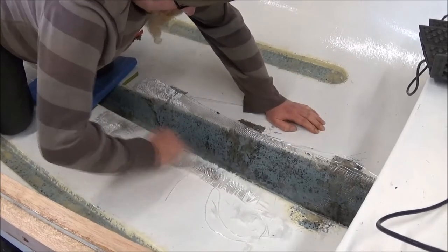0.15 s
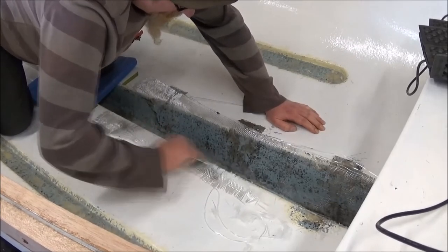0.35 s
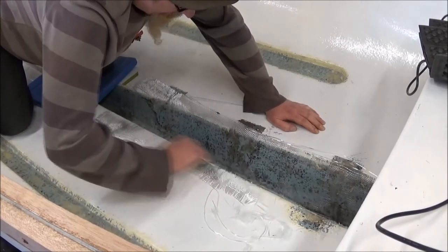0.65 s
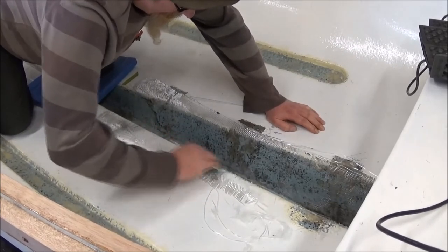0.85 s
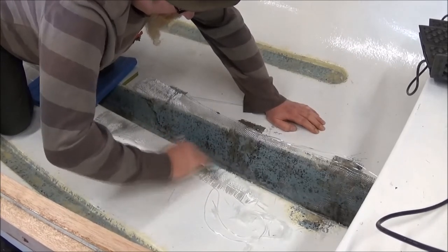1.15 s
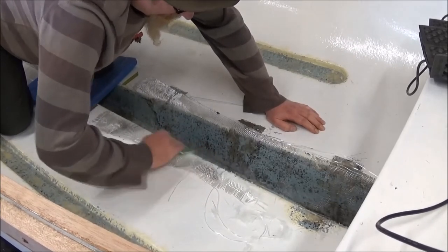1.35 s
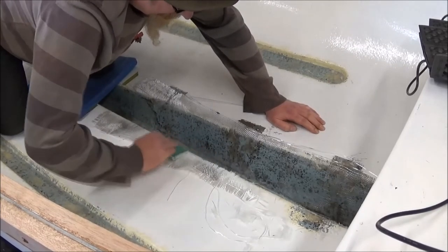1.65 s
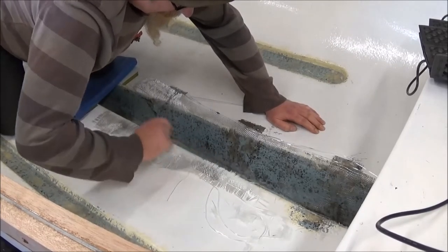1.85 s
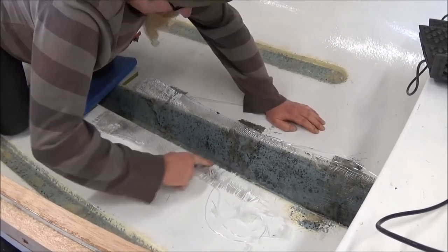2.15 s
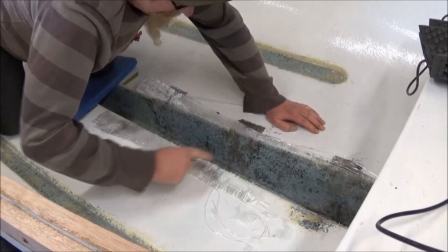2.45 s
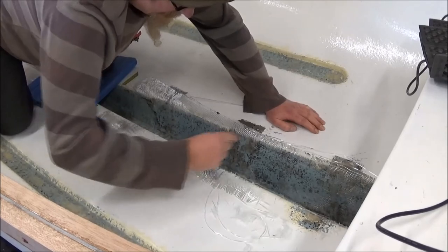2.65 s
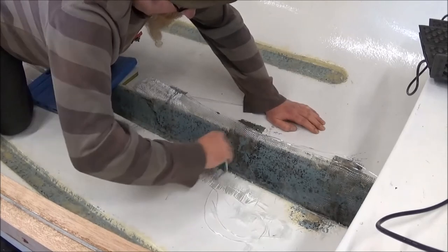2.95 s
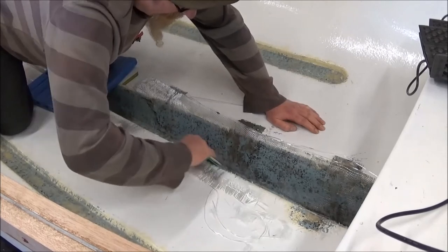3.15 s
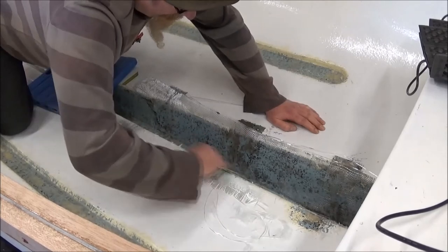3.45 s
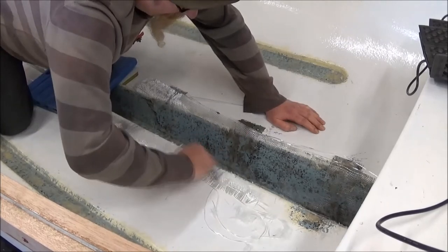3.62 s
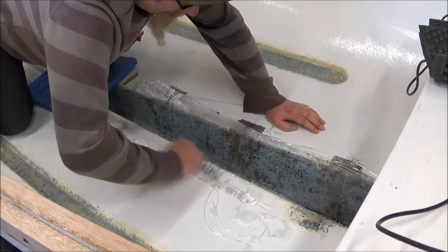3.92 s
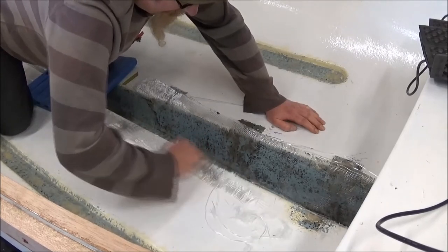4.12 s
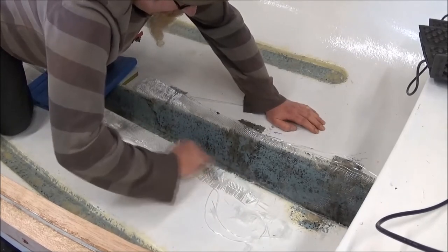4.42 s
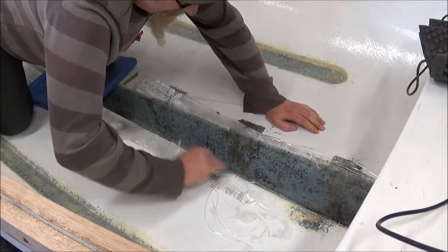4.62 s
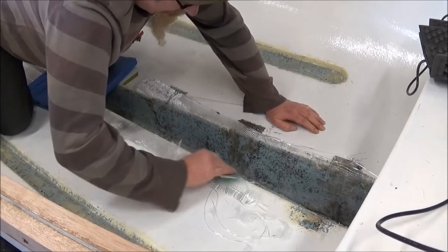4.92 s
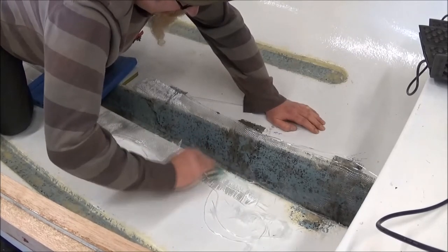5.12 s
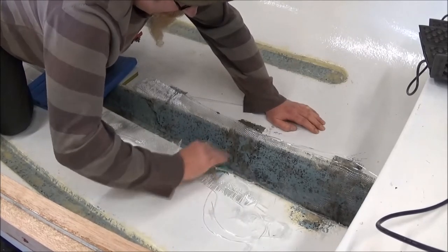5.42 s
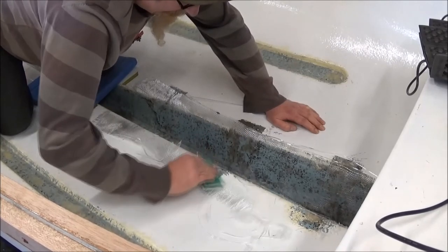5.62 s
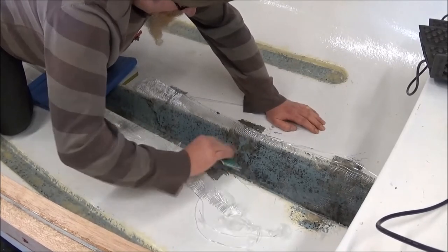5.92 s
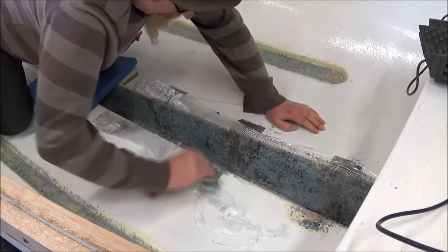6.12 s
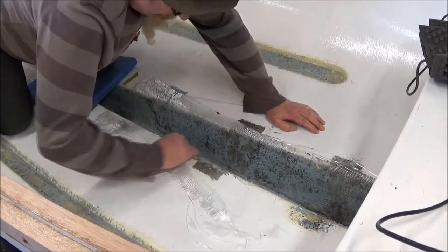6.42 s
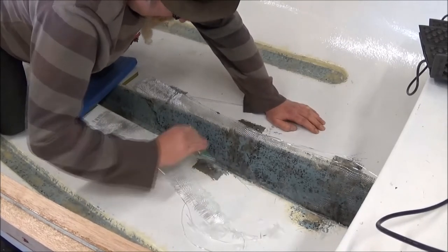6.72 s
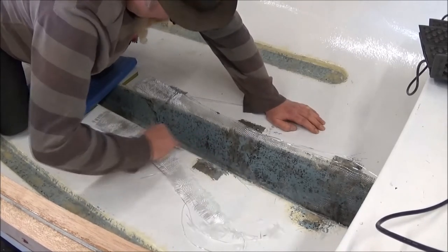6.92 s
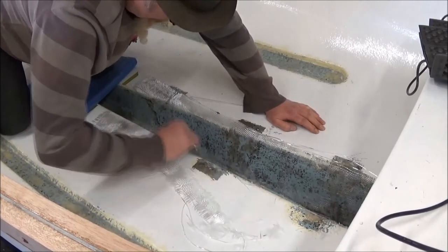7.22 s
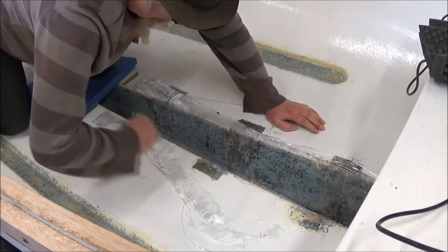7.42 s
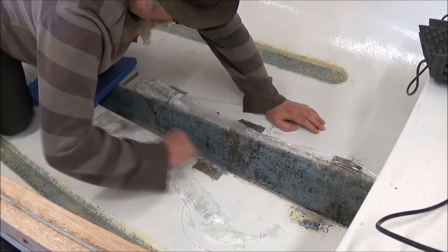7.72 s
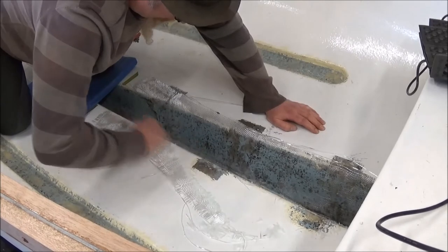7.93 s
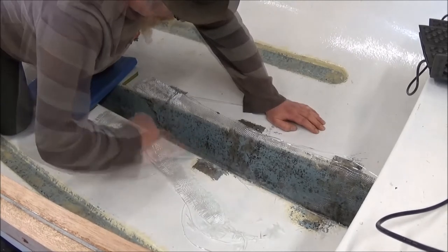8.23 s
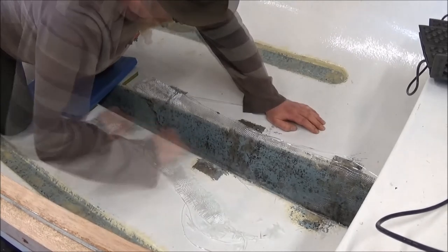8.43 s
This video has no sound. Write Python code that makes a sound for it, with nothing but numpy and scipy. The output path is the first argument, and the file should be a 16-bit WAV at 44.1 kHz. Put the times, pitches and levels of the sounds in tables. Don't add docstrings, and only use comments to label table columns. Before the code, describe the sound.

Close, dry sandpaper strokes go briskly back and forth, about six a second, over rough hardened resin, the hollow hull drumming beneath. After two seconds they pause for a knock, faint scuffs and ticks, then resume as fast. Later come broken strokes, low thumps, and lighter sweeps fading out. Workshop with short reflections and faint hum, small camera microphone nearby.

```python
import sys
import numpy as np
from scipy import signal
from scipy.fft import irfft
from scipy.io import wavfile
from scipy.ndimage import uniform_filter1d, map_coordinates

SR = 44100
rng = np.random.default_rng(int(sys.argv[2]) if len(sys.argv) > 2 else 0)


def volts_from_db(level):
    exponent = np.asarray(level, float) / 20
    return 10 ** exponent


def transcribe(u):
    v = np.clip(np.atleast_2d(u).T, -1, 1)
    q = np.round(v * 32767).astype(np.int16)
    wavfile.write(sys.argv[1], SR, q)


N = 377937

# time [s], level [dB].
WORKSHOP_LEVEL = [
    (0, -57),
    (2.6, -54),
    (5.9, -57.5),
    (6.8, -58.5),
    (7.25, -64.5),
    (8.57, -71),
]
# frequency [Hz], density [dB per Hz].
WASH_SPECTRUM = [(20, -1), (60, -11), (200, -9.5), (400, -18), (900, -14.5), (1600, -23.5), (2300, -24.5),
                 (9000, -30.5), (15800, -37)]
# frequency [Hz], level [dB].
MAINS_HUM = [(100, -64.5), (199.5, -59)]
# frequency [Hz], width [Hz], level over the wash [dB].
MACHINE_WHINE = [(1290, 81, -14), (1647, 26, -16), (1730, 25, -22)]
# centre [s], level [dB], half-width [s].
WHINE_SWELLS = [
    (2.0, 1, 0.096),
    (5.92, 7, 0.14),
    (6.8, 0, 0.11),
]

# frequency [Hz], t60 [s].
WALL_DECAY = [(250, 0.51), (700, 0.42), (1700, 0.35), (4600, 0.37), (12000, 0.17)]
# frequency [Hz], likeness [0..1].
EAR_LIKENESS = [(60, 1.0), (300, 0.93), (700, 0.62), (1400, 0.12), (3000, 0.6), (7000, 0.57), (10000, 0.82),
                (12500, 0.89)]

# time [s], push [dB], push length [s], knock [dB], boom [dB].
THUMPS = [
    (1.05, -49, 0.018, -57, -40),
    (2.065, -35, 0.016, -25, -33.5),
    (5.477, -27, 0.016, -36.5, -43),
    (6.041, -29.5, 0.018, -30.5, -44),
    (6.423, -36, 0.016, -32, -51),
    (6.9, -50, 0.011, -42, -58),
    (7.292, -34, 0.015, -30, -46),
    (7.7, -44, 0.014, -39, -60),
    (2.829, -54, .01, -49.5, -58),
]
# frequency [Hz], level [dB], t60 [s].
KNOCK_MODES = [(144, -1.5, 0.1), (217, -2.5, 0.091), (330, -1, 0.036), (423, -6, 0.038),
               (562, -12.5, 0.042)]
BOOM_HZ, BOOM_T60_S = 101, 0.7
KNOCK_SAG, KNOCK_SAG_S = 0.12, 0.027

# frequency [Hz], density [dB per Hz].
DRUM_SPECTRUM = [(90, -42.5), (160, -7.5), (210, 1), (330, 0.5), (520, -2), (760, -6.5), (1000, -24),
                 (1500, -32)]
RASP_SPECTRUM = [(500, -15.5), (750, -6), (1200, -3), (1600, -0.5), (2100, -3.5), (2500, -3), (3300, -29)]
ROCK_SPECTRUM = [(20, -8.5), (40, -10), (62, 1), (80, 3.5), (100, -1.5), (135, 3), (200, -28)]
# frequency [Hz], width [Hz], level [dB].
PANELS = [(221, 93, 10), (416, 58, -2), (535, 36, 7), (1035, 87, 9), (1161, 134, 11), (1321, 41, 13.5)]
# centre [s], level [dB], half-width [s].
CHATTER_SWELLS = [(0, -43.5, 0.067), (.21, -48.5, 0.029), (.385, -37, 0.048), (.54, -52, 0.067),
                  (.99, -47, 0.034), (1.05, -40, 0.017), (1.13, -43.5, 0.037), (1.2, -39, 0.03),
                  (1.37, -46, 0.03), (1.48, -46.5, 0.06), (1.81, -45, 0.043), (2.98, -53, 0.076),
                  (3.91, -44, 0.028), (4.05, -48, 0.05), (4.18, -50.5, 0.033), (4.34, -47, 0.028),
                  (4.89, -44, 0.018), (5.09, -43, 0.014), (5.5, -46, 0.012), (5.59, -45, 0.028),
                  (6.11, -49, 0.027), (6.47, -44, 0.036), (6.56, -46.5, 0.021)]
# centre [s], level [dB], half-width [s].
BUZZ_SWELLS = [(.69, -51, 0.072), (1.33, -51, .04), (1.81, -49.5, 0.074), (2.3, -66, 0.043),
               (2.37, -63, .025), (2.835, -53.5, 0.013), (2.97, -65, 0.038), (3.17, -57, 0.04),
               (3.35, -48.5, 0.08), (3.55, -52, 0.066), (5.75, -64, 0.088), (6.16, -48, 0.066),
               (6.57, -46.5, 0.063), (7.07, -51, 0.05), (7.44, -46.5, 0.02)]
# centre [s], level [dB], half-width [s].
SWAY_SWELLS = [(.93, -53, 0.11), (1.5, -48, 0.17), (1.8, -57, 0.084), (2.15, -38, 0.089), (2.5, -59, .1),
               (3.05, -49, 0.19), (3.7, -41, 0.23), (4.2, -37, 0.26), (4.92, -40.5, 0.23), (5.5, -52, .08),
               (5.9, -62, .1), (6.07, -31, 0.052), (6.2, -52, .08), (6.47, -32, 0.095), (7.73, -63, .06),
               (7.93, -48, .05)]
DRUM_DB, DRUM_LAW = -30, 0.55
RASP_DB, RASP_LAW, RASP_WEIGHT, RASP_LAG_S = -28.5, 0.65, 0.5, 0.015
ROCK_DB, ROCK_LAW, ROCK_REST_DB, SWAY_TRIM_DB = -50.5, 0.82, -77, -14.5
CHATTER_PER_S, CHATTER_HZ, CHATTER_WIDTH_HZ = 62, 303, 133

# start [s], length [s], start level [dB], end level [dB].
STROKES = [(-.03, .12, -14, -28.5), (.297, 0.13, -21.5, -22.5), (.475, 0.12, -19, -24),
           (.643, .12, -20, -21), (.781, .14, -20, -24), (.95, .12, -24, -19.5), (1.1, .12, -21, -23.5),
           (1.251, .1, -24.5, -18), (1.398, 0.1, -22, -22.5), (3.112, 0.13, -19.5, -28),
           (3.275, 0.13, -16, -28.5), (3.432, .14, -20.5, -25), (3.623, .11, -24, -22.5),
           (3.783, 0.12, -21, -23.5), (4.093, .11, -23.5, -21), (4.242, 0.11, -20, -24),
           (4.394, 0.095, -21.5, -23.5), (4.524, 0.087, -22.5, -22.5), (4.643, 0.096, -22, -24),
           (4.778, .12, -20.5, -25.5), (5.121, .13, -23.5, -25)]
# start [s], length [s], start level [dB], end level [dB].
SWEEPS = [
    (6.068, .15, -24.5, -25),
    (6.893, 0.18, -28, -28.5),
    (7.288, 0.18, -28, -31),
    (7.488, 0.082, -28.5, -43),
    (7.719, 0.17, -31.5, -32),
    (7.916, 0.16, -30, -37.5),
    (8.101, 0.14, -33, -34.5),
    (8.271, .14, -34, -35),
    (8.42, 0.16, -38, -34.5),
]
# start [s], length [s], start level [dB], end level [dB].
EASED = [(.109, 0.15, -24.5, -20), (1.583, 0.083, -16.5, -25.5), (1.69, 0.055, -26, -27),
         (1.936, 0.068, -45.5, -46.5), (2.201, 0.2, -41.5, -52), (2.872, .022, -41, -45),
         (2.926, 0.067, -40, -42.5), (3.047, 0.073, -34, -36), (3.975, 0.09, -17, -27.5),
         (4.992, 0.085, -28, -23.5), (5.495, 0.09, -27.5, -33.5), (5.608, 0.087, -25.5, -24.5),
         (6.461, .12, -26, -28)]
# start [s], length [s], start level [dB], end level [dB].
FLICKS = [(1.775, 0.048, -28, -38.5), (1.869, 0.046, -36.5, -37), (2.061, 0.027, -41, -44.5),
          (2.46, 0.048, -47, -60), (2.514, 0.046, -42, -39), (2.689, 0.028, -41, -29.5),
          (2.75, 0.015, -34, -29), (2.9, 0.018, -26.5, -45), (5.419, 0.02, -61, -39),
          (5.466, .013, -33, -42), (5.872, 0.025, -43.5, -60), (6.015, .012, -49, -49),
          (6.036, 0.027, -33.5, -45), (6.386, 0.012, -41, -37), (6.397, 0.025, -51, -23),
          (7.678, 0.038, -35, -43)]
STROKE_RISE_S, SWEEP_RISE_S, EASED_RISE_S, FLICK_RISE_S = 0.0078, 0.0098, 0.024, 0.003
# time [s], pressure [dB], palm resonance [Hz], weight on the hull [dB].
HAND = [(0, -12, 4400, -1), (.7, -10.5, 4030, 1), (1.15, -11, 3900, 1.5), (1.45, -17, 4050, -1),
        (1.65, -12, 3540, -2), (2.05, -4, 3800, -7.5), (2.3, -6, 3730, 3), (2.55, -6.5, 4200, -13),
        (2.85, -21, 4400, -4.5), (3.05, -2, 4400, 3.5), (3.17, -20, 4100, -5), (3.33, -8.5, 4260, -2),
        (4.3, -3, 3500, 0), (5.2, -11.5, 3500, -2), (5.5, -1.5, 3800, 2.5), (6.5, -3.5, 3540, -3.5),
        (6.95, -9, 3860, -6), (8.57, -9, 4120, -7.5)]
# time [s], block note [Hz], note level [dB], finest-grit level [dB].
GRIPS = [(.04, 4000, 5, -0.5), (.2, 4000, 13, 3.5), (.37, 4200, 3, 0), (.54, 4000, -2, 0),
         (.71, 4100, -2.5, 2.5), (.85, 4100, 1, 3.5), (1.01, 3900, -2, 0.5), (1.16, 3400, -11, 0),
         (1.31, 3150, 6, 0), (1.45, 4200, -4, 2), (1.62, 3200, -1, -1), (2.3, 3700, -6, 2),
         (2.54, 5000, -8, 0), (2.72, 4500, -4, -2), (3.17, 3100, -8, 1), (3.33, 4300, 5, -4.5),
         (3.5, 4100, 4.5, -3), (3.68, 3860, 5.5, -1.5), (3.85, 4180, -10, 0), (4.02, 3430, 0.5, 0),
         (4.15, 2950, 2.5, 1), (4.3, 3000, 0.5, 0), (4.44, 2720, 7, -0.5), (4.57, 2950, -3.5, -1),
         (4.7, 2800, 1.5, 1), (4.84, 2850, -0.5, -2), (5.04, 3000, -1, -4), (5.19, 2600, 4, -3.5),
         (5.54, 3300, -8, -6), (5.66, 2540, 2.5, 2), (6.14, 2850, -2.5, -0.5), (6.52, 2850, -3.5, -2),
         (6.99, 3700, -6, 3.5), (7.38, 4100, -5, 1.5), (7.8, 4200, 5, 2), (8.0, 4300, -0.5, 2),
         (8.17, 3800, -10, 1), (8.34, 3200, 3, 0), (8.5, 4000, -5, 1.5)]
GRIP_WIDTH_HZ, BLOCK_EDGE_HZ = 690, 2410

# time [s], peak [dB].
EDGE_TAPS = [(0.9542, -16), (2.0647, -28), (2.4553, -43), (2.5132, -41.5), (2.8794, -34.5), (3.037, -16),
             (5.417, -30), (5.8755, -40), (6.023, -27), (6.0352, -27.5), (6.389, -22), (6.889, -18),
             (7.282, -30), (7.6799, -20.5)]
# time [s], peak [dB].
CRUMB_SNAPS = [
    (1.7494, -15.5),
    (1.7644, -21),
    (2.6584, -47),
    (2.7657, -35),
    (2.8275, -26),
    (2.944, -27),
    (6.7374, -47),
    (6.906, -21),
]
# time [s], peak [dB].
NICKS = [(.955, -12), (1.271, -17.5), (1.4956, -7), (1.8232, -20), (1.8836, -25.5), (1.897, -24.5),
         (1.9449, -35), (1.9835, -31), (2.1113, -36), (2.2424, -28), (2.3061, -31), (2.3761, -31),
         (2.6595, -45), (2.759, -33), (2.7652, -27), (2.8275, -28), (2.8299, -23.5), (2.9022, -24),
         (2.947, -25), (2.9684, -30), (3.0492, -21), (3.0594, -21), (4.031, -11), (4.1885, -6),
         (4.325, -18), (4.7795, -20), (5.1415, -18), (5.4606, -28), (5.4704, -30), (5.8484, -47),
         (5.882, -36), (6.2869, -36), (6.4237, -13.5), (7.5733, -27), (8.0527, -20), (8.3678, -23)]
# frequency [Hz], density [dB per Hz].
FIZZ_SPECTRUM = [(2300, -37.5), (2900, -13.5), (4100, -11.5), (7100, -8), (8300, -5.5), (9350, -1.5),
                 (10300, -5), (11500, -12), (13000, -22), (15800, -24)]
SHEEN_SPECTRUM = [(7500, -37), (9600, -17), (10900, -2.5), (12600, -5.5), (14200, -12), (15850, -22)]
# frequency [Hz], width [Hz], level [dB].
BITE_MODES = [(2750, 290, -14), (3114, 800, 4.5), (3500, 370, 4.5), (4050, 430, 4.5), (4570, 670, 4),
              (5490, 1120, 6), (6480, 860, 3)]


def evened(x):
    return x / np.sqrt(np.mean(x ** 2) + 1e-20)


def read(points, hz):
    f, value = np.transpose(points)
    return np.interp(np.log(hz + 1), np.log(f + 1), value)


def curve(rows):
    s, *columns = np.transpose(rows)
    return [np.interp(np.arange(N) / SR, s, c) for c in columns]


def swells(rows):
    t = np.arange(0, N + 64, 64) / SR
    s, db, half_s = np.transpose(rows)[:, :, None]
    bells = volts_from_db(db) * np.exp(-((t - s) / half_s) ** 2)
    return np.interp(np.arange(N) / SR, t, bells.sum(0))


def drift(per_s):
    knots = rng.standard_normal(4000)
    steps = np.arange(0, N + 64, 64)
    slow = map_coordinates(knots, [steps * per_s / SR], order=3)
    return np.interp(np.arange(N), steps, evened(slow))


def colour(x, points):
    log_gain = np.log(volts_from_db(read(points, abs(np.fft.fftfreq(8192, 1 / SR)))))
    impulse = np.fft.ifft(np.exp(np.conj(signal.hilbert(log_gain)))).real[:4096]
    return evened(signal.oaconvolve(x, impulse)[:N])


def ring(x, hz, width_hz):
    r = np.exp(-np.pi * 1.5 * width_hz / SR)
    pole = r * np.exp(2j * np.pi * hz / SR)
    return 2 * signal.lfilter([(1 - r) ** 2], [1, -2 * pole, pole ** 2], x + 0j).real


def wandering_ring(x, hz, width_hz):
    turn = np.exp(2j * np.pi * np.cumsum(hz * np.ones(len(x))) / SR)
    r = np.exp(-np.pi * 1.5 * width_hz / SR)
    smooth = signal.lfilter([(1 - r) ** 2], [1, -2 * r, r * r], x * turn.conj())
    return 2 * (turn * smooth).real


def ticks(per_s, spread_db):
    chance, size, sign = rng.random((3, N))
    size_db = spread_db * np.minimum(-np.log(size + 1e-9), 4)
    return (chance < per_s / SR) * volts_from_db(size_db) * np.sign(sign - 0.5)


def spread(a, b):
    same = np.clip(read(EAR_LIKENESS, np.fft.rfftfreq(2 * SR, 1 / SR)), 0, 1)
    parts = []
    for x, sign in [(a, 1), (b, -1)]:
        impulse = np.roll(irfft(np.sqrt(0.5 + sign * same / 2)), 512)[:1024] * np.hanning(1024)
        parts.append(signal.oaconvolve(x, impulse)[512:N + 512])
    mid, side = parts
    return np.array([mid + side, mid - side])


def workshop():
    wash = spread(*(colour(rng.standard_normal(N), WASH_SPECTRUM) for ear in "LR"))
    hiss = rng.standard_normal(N)
    whine = sum(volts_from_db(db - 3 + 0.88 * drift(6.6)) * evened(ring(hiss, hz, width_hz))
                for hz, width_hz, db in MACHINE_WHINE)
    hum = sum(volts_from_db(db + 3.5) * np.sin(2 * np.pi * hz * np.arange(N) / SR) for hz, db in MAINS_HUM)
    level = volts_from_db(curve(WORKSHOP_LEVEL)[0] + drift(2.72))
    return level * (wash + (1 + swells(WHINE_SWELLS)) * whine + volts_from_db(52) * hum)


def walls(x, turns_per_s=13):
    echoes = np.zeros((3, 2, SR // 2))
    jitter = rng.integers(0, 20, (3, 2, (SR // 2 - 201) // 20))
    at = np.arange(200, SR // 2 - 20, 20) + jitter
    np.put_along_axis(echoes, at, rng.choice([-1., 1.], at.shape), 2)
    hz, t, z = signal.stft(echoes, SR, nperseg=512)
    z = z / (abs(z) + 0.2 * abs(z).mean())
    decay = volts_from_db(-60 * t / read(WALL_DECAY, hz)[:, None])
    tails = signal.istft(z * decay, SR, nperseg=512)[1]
    phase = turns_per_s * np.arange(N) / SR + np.arange(3)[:, None, None] / 3
    turns = np.sqrt(2 / 3) * np.cos(np.pi * phase)
    wet = signal.oaconvolve(x * turns, tails / np.linalg.norm(tails[0, 0]), axes=2).sum(0)
    return spread(*wet[:, :N])


def thumps():
    out = np.zeros(N + SR)
    t = np.arange(SR // 2) / SR
    bent_t = t + KNOCK_SAG * KNOCK_SAG_S * (1 - np.exp(-t / KNOCK_SAG_S))
    luck = rng.random((len(THUMPS), len(KNOCK_MODES)))
    boom = volts_from_db(-60 * t / BOOM_T60_S) * np.sin(2 * np.pi * BOOM_HZ * t) * np.minimum(t / 0.027, 1)
    for (s, push_db, push_s, knock_db, boom_db), detune in zip(THUMPS, luck):
        push = np.sin(2 * np.pi * t / push_s) * np.exp(-t / push_s) * np.minimum(t / 0.0093, 1)
        knock = np.zeros(len(t))
        for (hz, db, t60_s), u in zip(KNOCK_MODES, detune):
            knock += volts_from_db(db - 60 * t / t60_s) * np.sin(2 * np.pi * hz * (0.927 + 0.23 * u) * bent_t)
        knock *= np.minimum(t / 0.0099, 1)
        bounce_1 = volts_from_db(-2.5) * np.roll(knock, round(0.01265 * SR))
        bounce_2 = volts_from_db(0.5) * np.roll(knock, round(0.0255 * SR))
        blow = volts_from_db(push_db) * push + volts_from_db(boom_db) * boom + volts_from_db(knock_db) * (knock - bounce_1 + bounce_2)
        out[round(s * SR):][:len(t)] += blow
    return out[:N]


def hull(moving):
    weight_db = curve(HAND)[2]
    speed = abs(uniform_filter1d(moving, 900, origin=300))
    keep = np.exp(-1 / (RASP_LAG_S * SR))
    lagging = signal.lfilter([1 - keep], [1, -keep], speed)

    bumps = ticks(2500, 3.1)
    panels = evened(sum(volts_from_db(db + 2.5 * drift(5)) * ring(bumps, hz, width_hz) for hz, width_hz, db in PANELS))
    drum = evened(colour(bumps, DRUM_SPECTRUM) + 0.76 * panels)
    drumming = volts_from_db(DRUM_DB + weight_db) * speed ** DRUM_LAW

    skips = bumps * np.exp(np.cos(2 * np.pi * CHATTER_PER_S * np.arange(N) / SR))
    skip_ring = evened(ring(skips, CHATTER_HZ, CHATTER_WIDTH_HZ))
    chatter = evened(skip_ring + 1.4 * colour(skips, DRUM_SPECTRUM))

    rasp = colour(ticks(5000, 4.4), RASP_SPECTRUM)
    rasping = volts_from_db(RASP_DB + RASP_WEIGHT * weight_db) * lagging ** RASP_LAW + swells(BUZZ_SWELLS)

    rock = colour(ticks(300, 8.3), ROCK_SPECTRUM)
    rocking = volts_from_db(ROCK_DB + weight_db) * abs(uniform_filter1d(speed, 6000)) ** ROCK_LAW
    rocking += volts_from_db(ROCK_REST_DB) + volts_from_db(SWAY_TRIM_DB) * swells(SWAY_SWELLS)
    return drumming * drum + swells(CHATTER_SWELLS) * chatter + rasping * rasp + rocking * rock


def strokes(stop_s=0.009, dulling=0.76):
    power = np.zeros(N)
    for rows, rise_s in [(STROKES, STROKE_RISE_S), (SWEEPS, SWEEP_RISE_S),
                         (EASED, EASED_RISE_S), (FLICKS, FLICK_RISE_S)]:
        for s, length_s, start_db, end_db in rows:
            at = np.arange(max(round((s - 0.1) * SR), 0), min(round((s + length_s + 0.1) * SR), N))
            t = at / SR - s
            start = np.sin(np.pi / 2 * np.clip(0.5 + 0.17 * t / rise_s, 0, 1)) ** 2
            stop = 1 / (1 + np.exp((t - length_s) / min(stop_s, 0.38 * length_s)))
            level = volts_from_db(np.interp(t, [0, length_s], [start_db, end_db]))
            power[at] += (start * stop * level) ** 2
    bite_db = curve(HAND)[0]
    sheen_db = np.clip(-dulling * bite_db, -6, 4)
    return np.sqrt(power) * volts_from_db(np.array([np.zeros(N), bite_db, sheen_db]))


def taps():
    out = np.zeros(N)
    t = np.arange(round(0.15 * SR)) / SR
    for rows, trim_db, t60_s in [(EDGE_TAPS, -11, 0.06), (CRUMB_SNAPS, -6, 0.025)]:
        for s, db in rows:
            out[round(s * SR):][:len(t)] += volts_from_db(db + trim_db - 60 * t / t60_s) * np.minimum(t / 0.0018, 1)
    return out


def grips():
    s, *columns = np.transpose(GRIPS)
    held = np.searchsorted((s[1:] + s[:-1]) / 2, np.arange(N) / SR)
    hz, db, sheen_db = (uniform_filter1d(c[held], 800) for c in columns)
    return hz, volts_from_db(db), volts_from_db(sheen_db)


def patchy(x, depth_db):
    z = signal.stft(x, nperseg=512)[2]
    patches = uniform_filter1d(rng.standard_normal(z.T.shape), 10, 0)
    patches = evened(uniform_filter1d(patches, 14, 1))
    return signal.istft(z * volts_from_db(depth_db * patches.T), nperseg=512)[1][:N]


def nicks():
    s, db = np.transpose(NICKS)
    hits = np.zeros(N)
    hits[np.round(s * SR).astype(int)] = volts_from_db(db) * np.sign(rng.random(len(s)) - 0.5)
    clicks = colour(hits, FIZZ_SPECTRUM)
    return clicks * abs(hits).max() / abs(clicks).max()


def sandpaper(gains):
    tap_gains = taps() * volts_from_db(np.array([[0], [-6], [1.5]]))
    fizz_gain, bite_gain, sheen_gain = np.hypot(gains, tap_gains)
    grip_hz, grip_gain, grip_sheen = grips()
    judder = volts_from_db(drift(120) + 0.063 * drift(30))

    fizz = fizz_gain * colour(ticks(16000, 2.6), FIZZ_SPECTRUM)
    fizz += volts_from_db(-14) * grip_sheen * sheen_gain * colour(ticks(14000, 4.6), SHEEN_SPECTRUM)

    catches = ticks(9000, 5.1)
    palm_hz = curve(HAND)[1]
    shift = (palm_hz / 3800) ** 0.23
    bite = volts_from_db(2.5) * grip_gain * wandering_ring(catches, grip_hz, GRIP_WIDTH_HZ)
    for hz, width_hz, db in BITE_MODES:
        mode_hz = hz * shift * (1 + 0.03 * drift(6))
        bite += volts_from_db(db + drift(12)) * wandering_ring(catches, mode_hz, width_hz)
    bite = signal.sosfilt(signal.butter(4, BLOCK_EDGE_HZ, "high", fs=SR, output="sos"), bite)
    return judder * patchy(volts_from_db(-1.5) * fizz + volts_from_db(-3) * bite_gain * evened(bite), 1.7)


def scene():
    gains = strokes()
    paper = sandpaper(gains) + nicks()
    shell = hull(gains[0])
    blows = thumps()
    direct = (paper + shell + blows) * volts_from_db(np.array([[-0.1], [0.1]]))
    to_walls = volts_from_db(-6) * paper + volts_from_db(-5.5) * shell + volts_from_db(-12) * blows
    return direct + walls(to_walls) + workshop()


def band_limit(x):
    return signal.sosfilt(signal.butter(12, 15910, fs=SR, output="sos"), x)


def record(dry):
    thin = signal.sosfilt(signal.butter(2, 42, "high", fs=SR, output="sos"), dry)
    rounded = 0.6 * np.tanh(thin / 0.6)
    edge = signal.firwin(511, 15900, window=("kaiser", 9), fs=SR)
    mix = signal.oaconvolve(rounded, edge[None], "same")
    return band_limit(mix)


dry = scene()
out = record(dry)
transcribe(out)
```